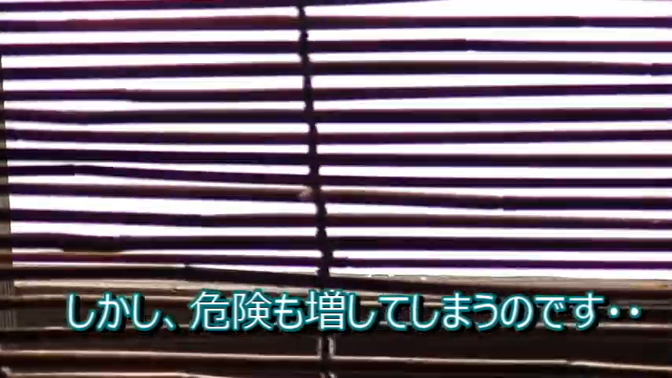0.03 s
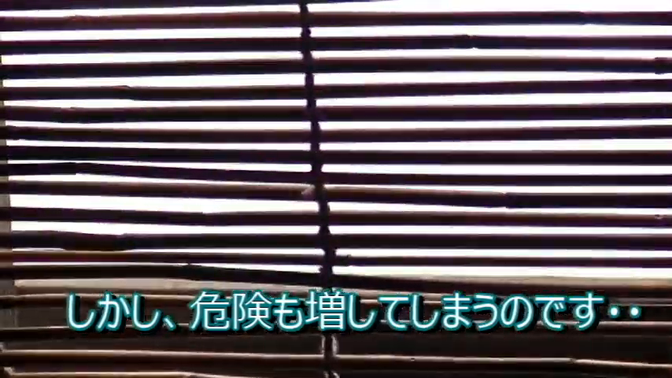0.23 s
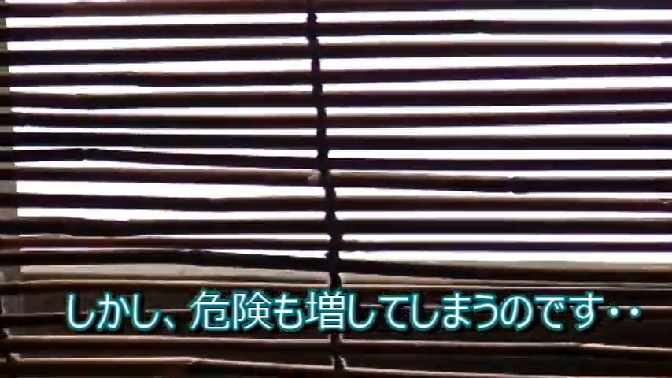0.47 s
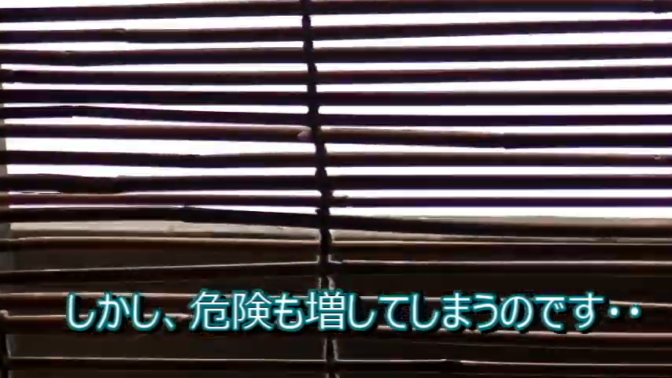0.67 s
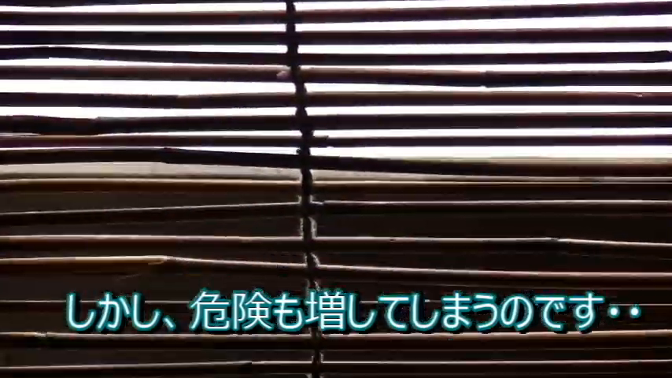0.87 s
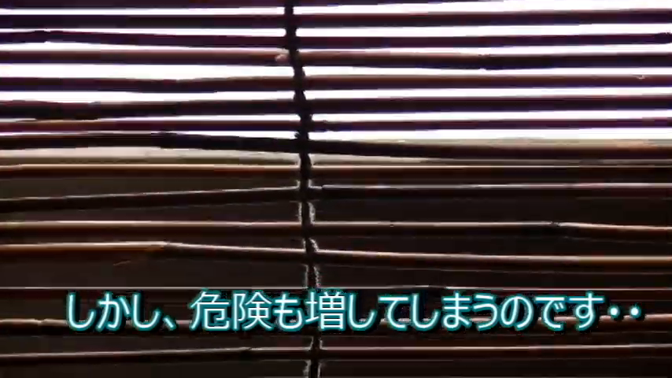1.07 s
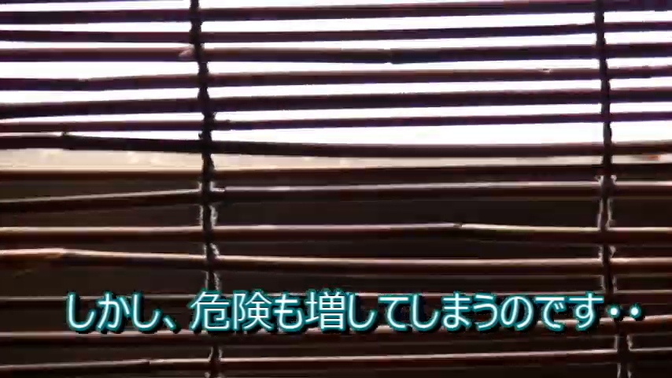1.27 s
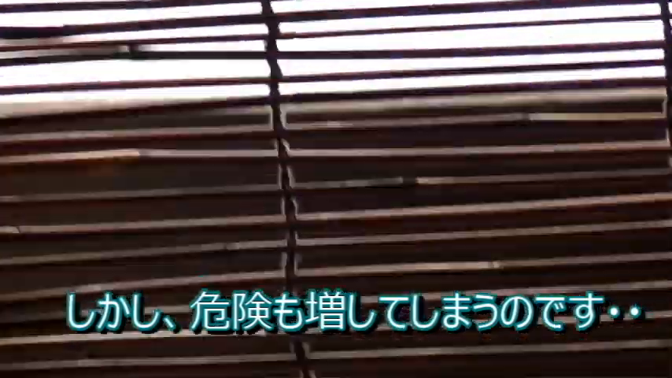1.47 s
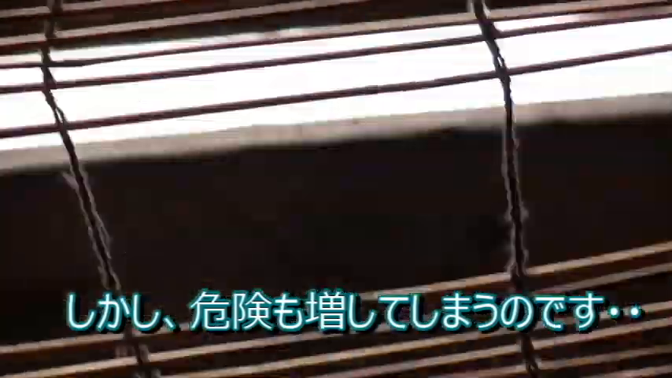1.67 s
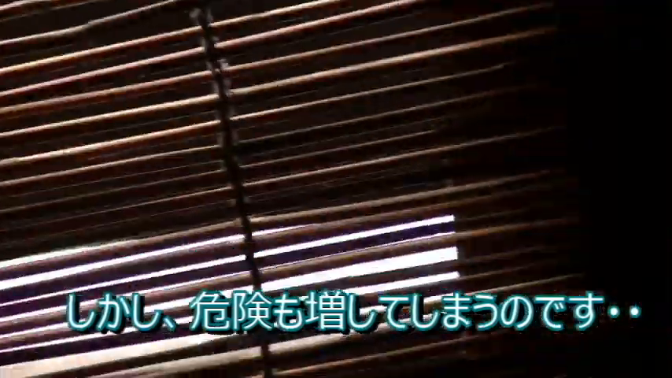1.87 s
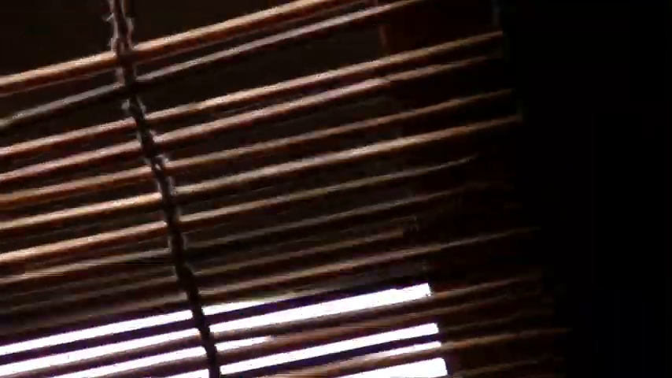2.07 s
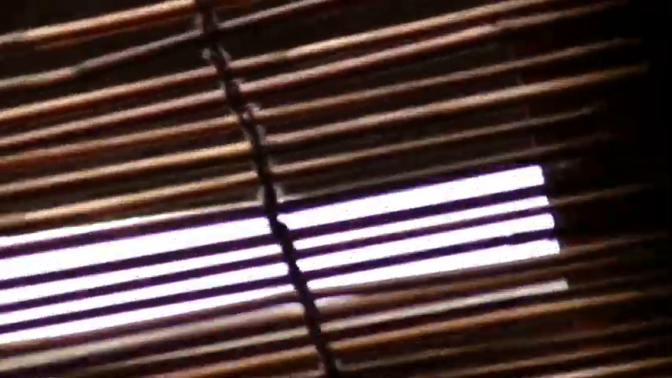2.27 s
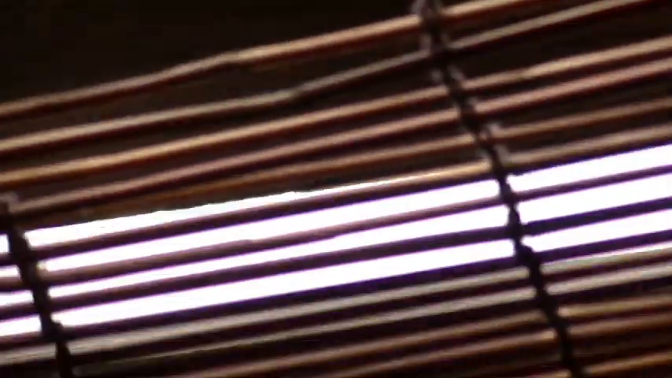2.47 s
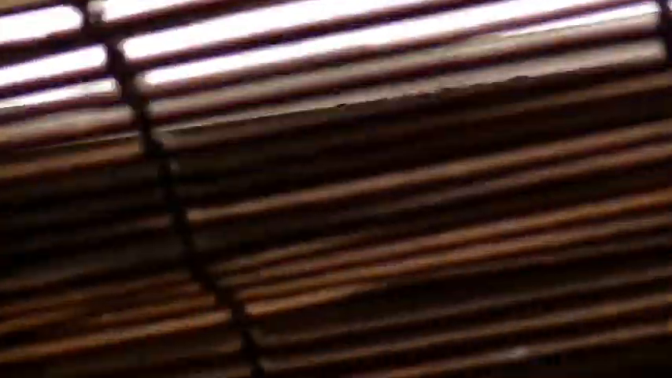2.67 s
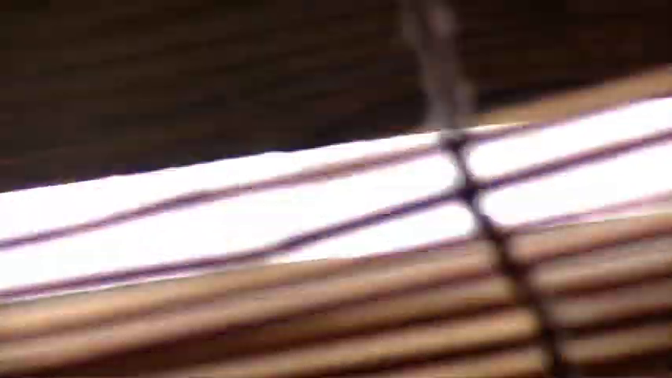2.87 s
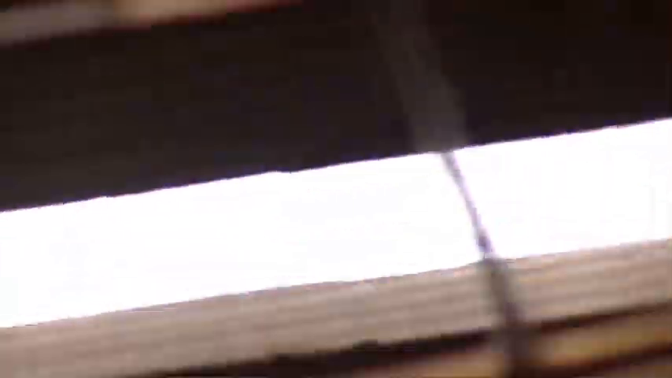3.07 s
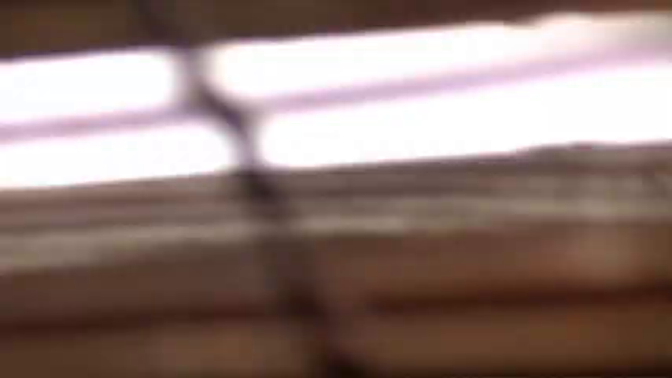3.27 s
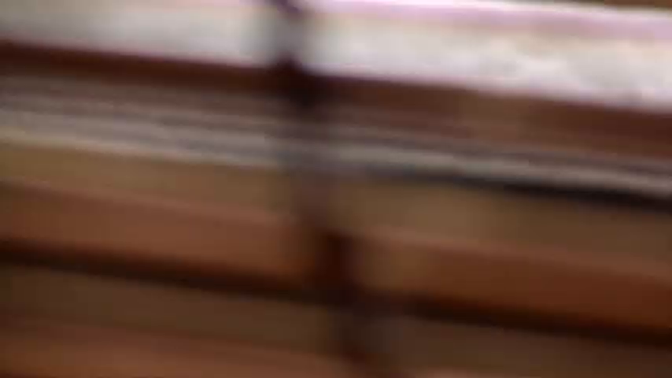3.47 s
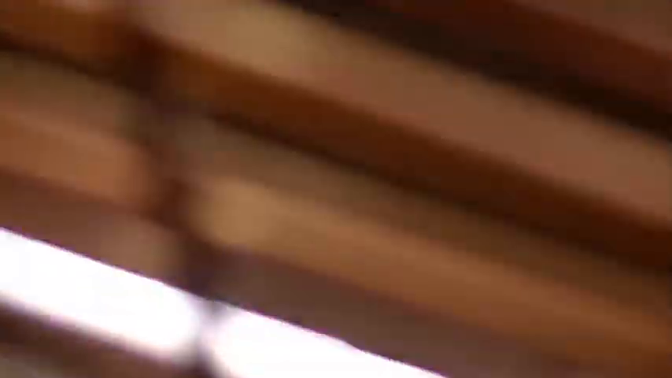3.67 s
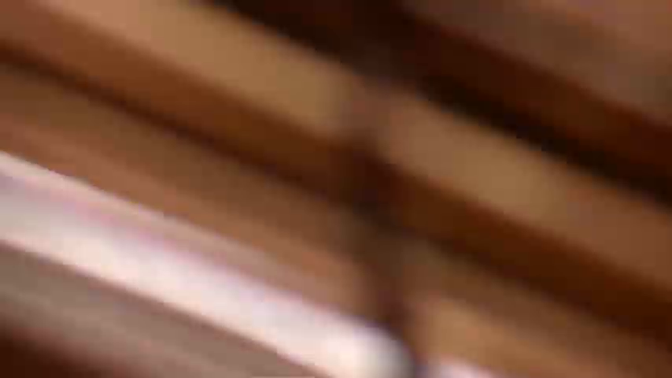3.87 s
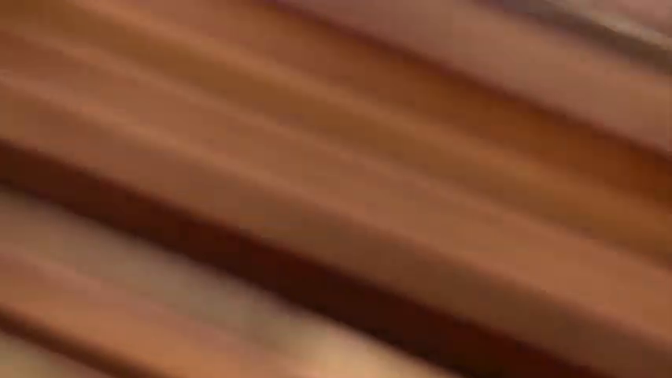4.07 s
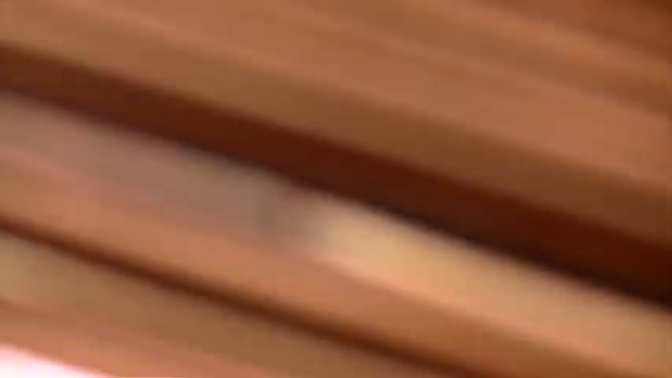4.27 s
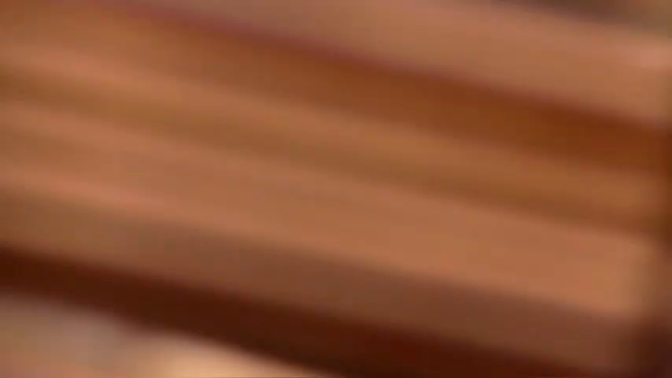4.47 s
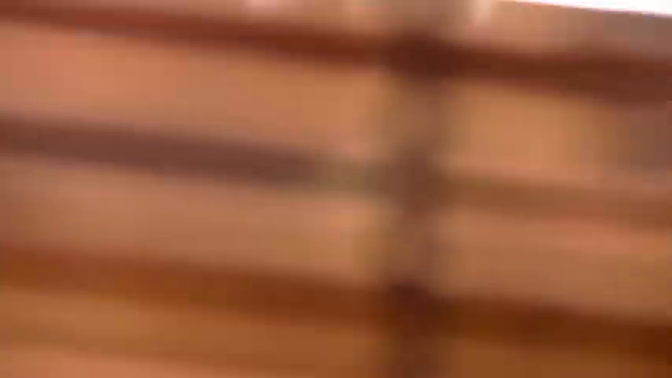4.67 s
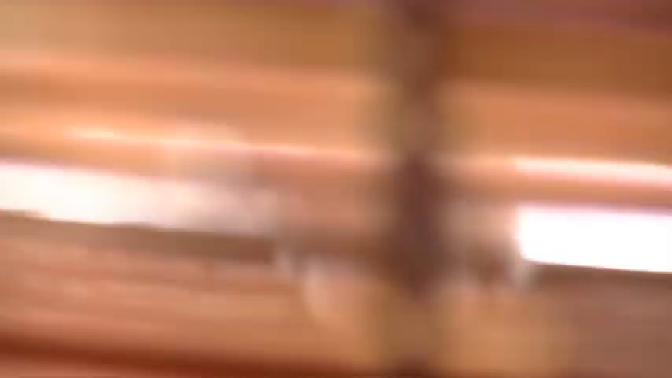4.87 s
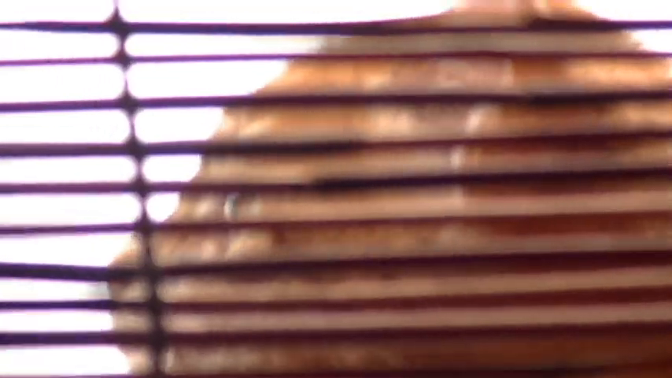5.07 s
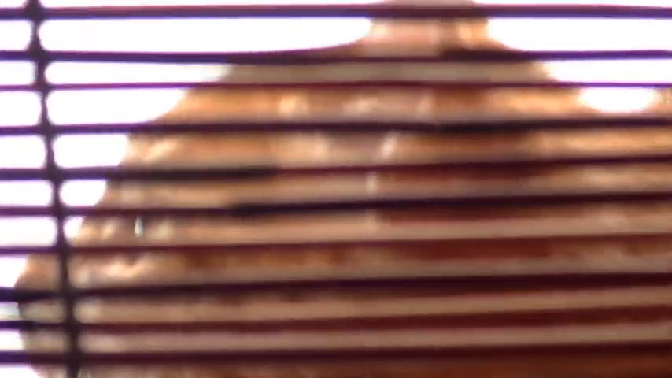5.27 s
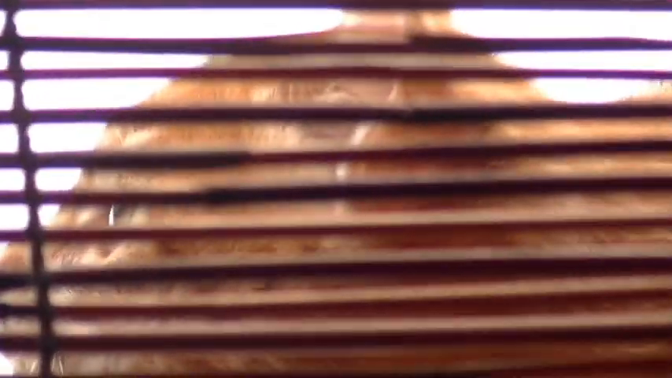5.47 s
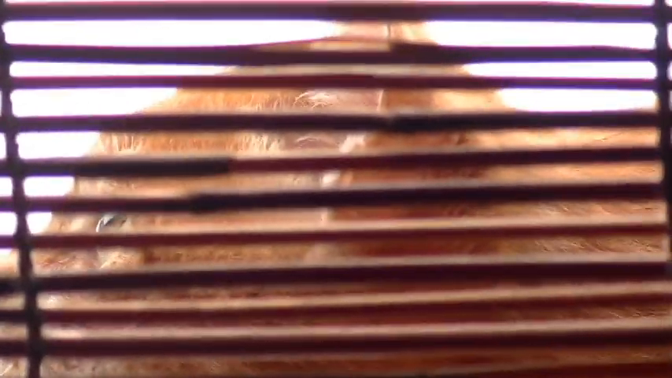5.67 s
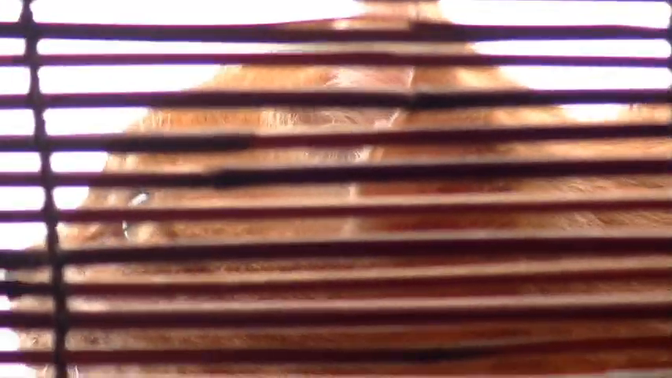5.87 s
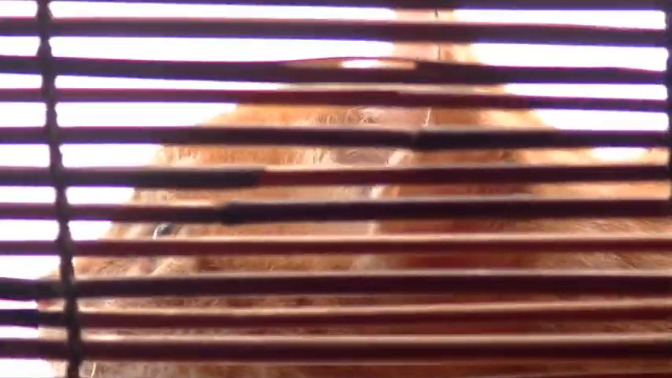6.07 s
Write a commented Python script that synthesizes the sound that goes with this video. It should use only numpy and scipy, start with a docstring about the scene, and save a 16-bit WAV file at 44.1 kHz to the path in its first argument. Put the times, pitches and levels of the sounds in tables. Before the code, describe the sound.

Soft paw thumps on a sill, light slat rattles, a flurry of hollow wooden window knocks, two last heavy bangs, then sudden near-quiet.

```python
"""Soft paws make a sill drone, then a cat clambers behind a blind of thin wooden slats at a house window.
Heard a hand's breadth away, the slats click, squeak and scrape: struck modes, and resonances driven by friction.
The swinging blind knocks on the sash, which booms and shudders in its frame: decaying modes and coloured noise.
Just before five seconds the low sounds stop dead; faint outdoor noise, a few scrapes and
a tiny ticking whirr (gated tones) go on."""
import sys
import numpy as np
from scipy import signal
from scipy.fft import rfft, irfft
from scipy.io import wavfile
from scipy.ndimage import uniform_filter1d

SR = 44100
rng = np.random.default_rng(int(sys.argv[2]) if len(sys.argv) > 2 else 0)


def transcribe(signal):
    """Save signal, clipped to [-1, 1], as a 16-bit WAV file at the path in sys.argv[1]."""
    frames = np.atleast_2d(signal).T
    limited = np.clip(frames, -1, 1)
    pcm = np.round(limited * 32767).astype(np.int16)
    wavfile.write(sys.argv[1], SR, pcm)


N = 269892
TIME = np.arange(N) / SR
RING = TIME[:SR]  # seconds after a blow, up to one second

# The blind hits the window; boom of the pane, knock of the frame, clack of the contact:
# start_s, boom_db, frame_db, clack_db
KNOCKS = [(1.592, -55, -52, -61), (1.885, -50.5, -43.5, -58), (1.962, -46, -51.5, -55),
          (2.356, -44.5, -60, -56), (2.683, -44.5, -43.5, -69), (2.887, -40, -49, -46),
          (3.085, -39.5, -44, -41), (3.147, -27, -25, -35.5), (3.159, -27.5, -26, -41),
          (3.177, -28, -38, -61), (3.205, -33.5, -60, -70), (3.223, -28, -33.5, -49),
          (3.359, -39, -40, -66), (3.416, -45, -50, -70), (3.479, -19.5, -20, -32.5),
          (3.572, -26.5, -39.5, -54), (3.6, -32, -54, -73), (4.606, -53, -63, -58.5),
          (4.7133, -14, -19, -29), (4.763, -24, -34.5, -62), (4.795, -46, -32, -55), (4.822, -16, -19, -31),
          (4.902, -30.5, -43, -49)]
# Modes of pane and frame, with relative levels: mode_hz, level_db, t60_s
WINDOW_MODES = [(141.3, -15.5, 1), (237.1, 1.5, 0.29), (267, -9, 0.37), (344.7, -6.5, 0.41),
                (378, -4.5, 0.5), (430.6, -10, 0.5), (454, -9, 0.87), (587, 1, 0.22), (642, -2, 0.12),
                (694.7, -3.5, 0.39), (763, 3, 0.16), (821.4, 6, 0.14), (915, 23, 0.024), (1056, 7.5, 0.13),
                (1282, 9, 0.082), (1484, 3.5, 0.047), (2015, -1.5, 0.054), (2086, 2.5, 0.053),
                (2370, -11, 0.025)]
# Relative spectrum of the chattering sash: frequency_hz, level_db
WINDOW_COLOUR = [(40, -53), (100, -54), (230, 0), (420, -8.5), (540, -13.5), (760, -4), (1250, -5.5),
                 (1600, -15), (2150, -19), (2800, -25), (5000, -36), (15000, -79)]


def knocks(chatter_db=-6, chatter_t60_s=0.29, room_db=-16, room_t60_s=1.0,
           swell_s=0.011, frame_lag_s=0.00249, friction_per_s=110):
    """Impact excitation: the blind lands along its length, so the sash rings, chatters and fills the room."""
    out = np.zeros((2, N))
    landing = np.minimum(0.38 + RING / swell_s, 1)
    for start_s, boom_db, frame_db, clack_db in KNOCKS:
        chatter = struck(noise(WINDOW_COLOUR, size=SR) * fade(chatter_t60_s))
        room = noise(SHUDDER_COLOUR, size=SR) * fade(room_t60_s)
        ringing = modes(WINDOW_MODES, scatter_db=4.0, detune=0.0078)
        body = landing * (ringing + undb(chatter_db) * chatter + undb(room_db) * room)
        # the harder the sash is driven, the faster friction in its groove calms it
        body = body / (1 + friction_per_s * undb(boom_db) * RING)
        # a heavy blow moves the pane
        boom = struck(band(body, "band", [55, 545]))
        add(out, start_s, undb(boom_db) * boom)
        # the sash takes up its play and meets the frame later; a hard contact adds the clack
        frame = struck(band(body, "band", [560, 1400]))
        clack = struck(band(body, "band", [1580, 3600]))
        add(out, start_s + frame_lag_s, undb(frame_db) * frame + undb(clack_db) * clack)
    return out


# How strongly the blind sways, as the relative level of the trembling it keeps up: time_s, level_db
SWAY = [(0, -41.5), (.35, -51), (.68, -48), (1.1, -49.5), (1.37, -52), (1.68, -41), (1.82, -48.5),
        (2.55, -47.5), (2.8, -43.5), (3.4, -43.5), (3.9, -40.5), (4.15, -46.5), (4.45, -45), (4.8, -46),
        (4.95, -51.5)]
# The blind leans softly on the sash, relative to the same level: hardest_push_s, level_db, length_s
NUDGES = [(1.19, -41.5, 0.061), (1.96, -40.5, 0.14), (5.29, -46, 0.061), (5.5, -48.5, 0.078),
          (5.98, -43, 0.067)]
# Relative spectrum of the jolts in the sash and of the room: frequency_hz, level_db
SHUDDER_COLOUR = [(30, -8), (90, -12.5), (150, 0.5), (250, 2.5), (420, 0), (560, 0), (800, -8.5),
                  (1300, -15), (2500, -21.5), (6000, -35.5), (15000, -79)]


def shudder(ring_db=-6, jerk_db=1.67, level_db=-1):
    """Random excitation: countless small jolts keep the modes trembling, more so as the blind sways or leans."""
    jolts = noise(SHUDDER_COLOUR, wide_db=14.5) * undb(jerk_db * walk(30))
    ring = excite(jolts, WINDOW_MODES)
    trembling = unit(unit(jolts) + undb(ring_db) * unit(ring))
    effort = np.hypot(curve(SWAY), pushes(NUDGES))
    return trembling * effort * undb(level_db)


# The bottom rail taps the frame; above dull_hz the treble falls: start_s, level_db, dull_hz
TAPS = [(2.336, -43.5, 1000), (2.969, -35, 1880), (3.8, -28.5, 3800), (3.939, -34, 1600),
        (4.277, -34, 1450), (4.371, -36.5, 1400)]
# Modes of the bottom rail against the frame, with relative levels: mode_hz, level_db, t60_s
RAIL_MODES = [(263.4, -6, 0.82), (427, -7, 0.57), (611, -0.5, 0.22), (657.5, 0.5, 0.2), (782, 6, 0.12),
              (815, 9, 0.097), (917, 1, 0.063), (1048, -9, 0.086), (1277, 5, 0.066), (2074, 1.5, 0.044)]


def taps():
    """Modal ringing: the bottom rail of the blind gives hollow taps on the frame."""
    return light_blows(TAPS, RAIL_MODES, WINDOW_COLOUR, grain_db=-2.5, grain_t60_s=0.13, swell_s=0.0014)


# A slat snaps against its neighbour; share of its own note, ring of the whole blind:
# start_s, level_db, pitch_hz, own_db, t60_s, ring_db
CLICKS = [(0.062, -55, 2500, 10, 0.032, -34), (0.374, -62.5, 4030, 1, 0.05, -25),
          (1.16, -52, 2060, 7, 0.052, -11), (1.531, -48.5, 3320, 10, 0.091, 4),
          (1.62, -61.5, 2190, -3, 0.041, 0), (1.812, -62.5, 3300, 3, 0.02, -30),
          (1.884, -53.5, 2420, -5, 0.1, 5), (2.262, -50.5, 9700, -32, 0.042, -27),
          (2.304, -48, 6400, 8, 0.022, 7), (2.336, -46, 2320, -14, 0.13, -8),
          (2.381, -48, 2320, 16, 0.045, 11), (2.425, -47.5, 11550, 5, 0.05, 9),
          (2.426, -44, 1201, 24, 0.18, -10), (2.68, -38, 5430, -6, 0.11, -26),
          (2.888, -42, 3520, -2, 0.027, -13), (2.965, -45.5, 4200, -10, 0.044, -29),
          (3.081, -38, 3280, -13, 0.13, 0), (3.429, -42.5, 2390, -17, 0.32, -26),
          (3.481, -46.5, 4100, -4, 0.084, -22), (3.578, -40, 5500, -22, 0.055, -21),
          (3.769, -51, 2300, -3, 0.017, -29), (3.789, -36.5, 6600, -12, 0.019, -37),
          (3.928, -50.5, 6960, -28, 0.018, -25), (4.479, -52, 2160, 18, 0.02, -29),
          (4.607, -52.5, 2050, 12, 0.08, -20), (4.715, -42, 5150, -24, 0.085, -27),
          (4.77, -51, 4170, -2, 0.033, -25), (4.824, -42.5, 5800, -11, 0.072, -24),
          (4.908, -43.5, 3230, 10, 0.025, -10), (5.07, -56.5, 12400, 0, 0.013, -5),
          (5.958, -55, 2600, 12, 0.048, 8)]
# Relative spectrum of a snap before thinning: frequency_hz, level_db
CLICK_COLOUR = [(300, -15), (1000, 3), (2300, 5.5), (4000, 2), (6000, -1.5), (8000, -5.5), (11500, -9),
                (16000, -24)]
# Modes of the slats, with relative levels: mode_hz, level_db, t60_s
SLAT_MODES = [(1197, 1, 0.2), (1900, 3, 0.12), (2250, 12, 0.033), (3320, -0.5, 0.085), (6360, -3, 0.11),
              (10530, 1, 0.047)]


def clicks(snap_t60_s=0.0022, room_db=-22, room_t60_s=0.16, width_times_t60=20,
           buzz_db=-3, low_edge_share=0.49, rise_per_t60=0.013):
    """Impact and coupling: a snap, the slat's short buzzing note, and a ring the cords pass to other slats."""
    out = np.zeros((2, N))
    for start_s, level_db, pitch_hz, own_db, t60_s, ring_db in CLICKS:
        decay = fade(snap_t60_s) + fade(t60_s) + undb(room_db) * fade(room_t60_s)
        # a high-pitched slat gives a thinner snap
        thin = signal.butter(2, low_edge_share * pitch_hz, "high", fs=SR)
        crack = struck(signal.lfilter(*thin, noise(CLICK_COLOUR, size=SR)) * decay)
        # the sooner a slat dies away, the broader its buzz
        width_hz = width_times_t60 / t60_s
        buzz = struck(resonate(noise(CLICK_COLOUR, size=SR), pitch_hz, width_hz) * decay)
        tone = modes([(pitch_hz, 0, t60_s)], scatter_db=0, detune=0)
        own = struck(tone + undb(buzz_db) * buzz)
        ring = modes(SLAT_MODES, scatter_db=1.0, detune=0.0055)
        # a long, grazing contact also starts more softly
        rise = 1 - np.exp(-RING / (rise_per_t60 * t60_s))
        click = struck(rise * (crack + undb(own_db) * own + undb(ring_db) * ring))
        add(out, start_s, undb(level_db) * click)
    return out


# A slat judders along a cord or its neighbour; level of its note, ring of the whole blind relative to it:
# start_s, length_s, pitch_hz, level_db, ring_db
SQUEAKS = [(1.535, 0.15, 3250, -61, 8), (1.877, 0.053, 2300, -53, 2), (1.956, 0.018, 2200, -52.5, -7.5),
           (2.692, 0.033, 2170, -48, -9), (3.08, 0.012, 11400, -51, -8), (3.09, 0.022, 6340, -38, -14),
           (3.09, 0.043, 2230, -36.5, -6), (3.099, 0.023, 3360, -53, -8)]


def squeaks(slips_per_s=1100, width_hz=140, release_s=0.012, sag_db=5, grit_db=-10):
    """Stick-slip friction: uneven slips ring a dragged slat's rough, fading note and the slats tied to it."""
    out = np.zeros((2, N))
    for start_s, length_s, pitch_hz, level_db, ring_db in SQUEAKS:
        sag = undb(-sag_db * np.minimum(RING / length_s, 1))
        drag = sag * np.exp(-np.maximum(RING - length_s, 0) / release_s)
        slips = (rng.random(SR) < slips_per_s / SR) * rng.standard_normal((2, SR))
        jerks = colour(slips, SLIDE_COLOUR, wide_db=-2) * drag
        note = struck(resonate(jerks, pitch_hz, width_hz))
        ring = struck(excite(jerks, SLAT_MODES))
        squeak = note + undb(ring_db) * ring + undb(grit_db) * struck(jerks)
        add(out, start_s, undb(level_db) * squeak)
    return out


# One slat slides over another: hardest_push_s, level_db, length_s
SCRAPES = [(0.43, -53.5, 0.065), (1.43, -53.5, 0.077), (1.62, -51.5, 0.19), (1.73, -48, 0.036),
           (1.9, -41.5, 0.059), (1.955, -47, 0.048), (2.35, -56.5, 1), (2.638, -44.5, 0.059),
           (2.76, -52.5, 0.27), (2.92, -45, 0.12), (3.108, -43.5, 0.077), (3.18, -44, 0.18),
           (3.333, -48.5, 0.14), (3.463, -40, 0.045), (3.56, -49.5, 0.19), (3.903, -46, 0.044),
           (4.23, -55, 0.04), (4.73, -48.5, 0.14), (4.895, -53, 0.099), (5.445, -55, 0.049),
           (5.777, -45, 0.076), (5.888, -49, 0.076), (6.063, -56, 0.1)]
# Relative spectrum of wood rubbing on wood: frequency_hz, level_db
SLIDE_COLOUR = [(250, -33), (700, -0.5), (1200, 1.5), (1600, -2.5), (2200, -7), (3200, -7), (6000, -3),
                (8000, -5.5), (11500, -7.5), (16000, -21.5)]


def slide(catches_per_s=1200, rub_db=-1, ring_db=-2, shift_db=4.5, jerk_db=0.97, sway_db=-17):
    """Dry friction: rough wood catches and slips in tiny clicks over a fine hiss, and sets the slats ringing."""
    catches = (rng.random(N) < catches_per_s / SR) * rng.standard_normal((2, N))
    rub = unit(colour(catches, SLIDE_COLOUR, wide_db=1.0) + undb(rub_db) * noise(SLIDE_COLOUR))
    # rubbing reaches only the lower modes, and favours other ones as the contact moves
    ring = 0
    for mode_hz, level_db, t60_s in SLAT_MODES[:4]:
        ring = ring + undb(level_db + shift_db * walk(21.915)) * resonate(rub, mode_hz, 24 / t60_s)
    # between the scrapes the swaying slats keep rubbing faintly
    effort = np.hypot(pushes(SCRAPES), undb(sway_db) * curve(SWAY))
    return unit(rub + undb(ring_db) * unit(ring)) * effort * undb(jerk_db * walk(70))


# A paw comes down on the sill; above dull_hz the treble falls: start_s, level_db, dull_hz
BUMPS = [(0.001, -40.5, 1700), (0.028, -39.5, 1110), (0.137, -39, 2380), (0.208, -41.5, 1800)]
# Modes of the sill, with relative levels: mode_hz, level_db, t60_s
SILL_MODES = [(147.3, -4.5, 0.98), (233, 5.5, 0.46), (338, 1.5, 0.46), (716, -1, 0.28), (832, -10, 0.42)]


def bumps():
    """Soft impact: padded paws make the sill drone."""
    return light_blows(BUMPS, SILL_MODES, SHUDDER_COLOUR, grain_db=1.5, grain_t60_s=0.22, swell_s=0.0075)


# Tiny ticking whirr, perhaps a focusing lens: time_s, lower_pip_db, upper_pip_db
WHIRR = [(0, -71, -80), (1.08, -77, -81), (1.3, -82, -80), (4.7, -82, -95), (4.96, -69.5, -89),
         (5.35, -74, -73), (5.7, -74, -80), (6.12, -82, -78)]


def whirr(tick_hz=31.0, lower_hz=3920, upper_hz=5880, upper_jitter_db=3.0):
    """Amplitude modulation: two tones are gated into soft, slightly uneven pips."""
    phase = np.cumsum(tick_hz * (1 + 0.025 * walk(7.1))) / SR
    pips = np.sin(np.pi * phase) ** 8 * undb(1.5 * walk(30))
    levels = np.array(WHIRR)
    lower = unit(pips * np.sin(2 * np.pi * lower_hz * TIME))
    upper = unit(pips * undb(upper_jitter_db * walk(17)) * np.sin(2 * np.pi * upper_hz * TIME))
    return lower * curve(levels[:, :2]) + upper * curve(levels[:, ::2])


# Low rumble of the hand that holds the microphone: time_s, level_db
RUMBLE = [(0, -60.5), (.5, -72), (1.1, -75), (2.1, -82), (2.6, -62), (3.1, -50), (3.9, -52.5), (4.6, -58)]
# Relative spectrum of that rumble: frequency_hz, level_db
RUMBLE_COLOUR = [(15, -3), (42, 2.5), (70, 7.5), (120, 9), (300, -28.5), (1000, -54)]


def rumble():
    """Handling noise: low-frequency random vibration whose level follows the hand."""
    return noise(RUMBLE_COLOUR, wide_db=-11.0) * curve(RUMBLE)


# Relative spectrum of the outdoor air: frequency_hz, level_db
OUTDOOR_COLOUR = [(25, -15), (150, -15.5), (300, -9.5), (480, -34), (700, -12), (1100, -10.5), (1500, -12),
                  (2200, -13), (3200, -13), (6500, -16), (11000, -19.5), (16000, -26)]


def outdoors(level_db=-60.5, hum_hz=700, hum_waver_db=1.0, hum_db=-6):
    """Diffuse sound field: a distant wash swells a little around a gently wavering hum, under steady hiss."""
    air = noise(OUTDOOR_COLOUR, wide_db=17.5)
    wash = signal.sosfiltfilt(signal.butter(2, 1400, fs=SR, output="sos"), air)
    hiss = air - wash
    swell = undb(1.5 * walk(12))
    hum = undb(hum_db + hum_waver_db * walk(3.7)) * unit(np.sin(2 * np.pi * hum_hz * TIME))
    return undb(level_db) * (hiss + wash * swell + hum)


def light_blows(rows, table, grain_colour, grain_db, grain_t60_s, swell_s):
    """Contact stiffness: wood rings cleanly over a little grain, and a softer contact is duller."""
    out = np.zeros((2, N))
    for start_s, level_db, dull_hz in rows:
        grain = struck(noise(grain_colour, size=SR) * fade(grain_t60_s))
        body = modes(table, scatter_db=2.5, detune=0.0046) + undb(grain_db) * grain
        swell = 1 - np.exp(-RING / swell_s)
        body = signal.lfilter(*signal.butter(2, dull_hz, fs=SR), body * swell)
        add(out, start_s, undb(level_db) * struck(body))
    return out


def modes(table, scatter_db, detune):
    """Modal superposition: decaying sines, weighted anew as each blow lands on another spot."""
    out = 0
    for mode_hz, level_db, t60_s in table:
        size, shift, skew = rng.standard_normal(3)
        # left and right phases part by more where the stereo width is greater
        spread = skew * gains(WIDTH, mode_hz) * np.array([[1], [-1]])
        phase = rng.uniform(0, 2 * np.pi) + spread
        tone = np.sin(2 * np.pi * mode_hz * (1 + detune * shift) * RING + phase)
        out = out + undb(level_db + scatter_db * size) * fade(t60_s) * tone
    return struck(out)


def excite(x, table):
    """Resonant build-up: drive a table of modes; the longer a mode rings, the more it builds up."""
    ring = 0
    for mode_hz, level_db, t60_s in table:
        width_hz = np.log(1000) / np.pi / t60_s
        ring = ring + undb(level_db) * t60_s * resonate(x, mode_hz, width_hz)
    return ring


def resonate(x, centre_hz, width_hz):
    """Resonance: a second-order peak with a gain of 1 at its centre."""
    return signal.lfilter(*signal.iirpeak(centre_hz, centre_hz / width_hz, SR), x)


def pushes(rows, edge_db=9.5, build_share=0.43):
    """Energy summation: soft pushes build up, peak and ease off, edge_db weaker at both ends of their length."""
    power = 0
    for peak_s, level_db, length_s in rows:
        before = (peak_s - TIME) / build_share
        after = (TIME - peak_s) / (1 - build_share)
        away = np.maximum(before, after) / length_s
        power = power + undb(level_db - edge_db * away) ** 2
    return np.sqrt(power)


# Stereo width, side minus mid: frequency_hz, level_db
WIDTH = [(30, -6), (130, -24.5), (400, -27), (1000, -21.5), (2000, -15.5), (4000, -10), (8000, -7),
         (12000, -4)]


def colour(pair, points, wide_db):
    """Mid-side stereo: colour two signals and mix them to left and right, wider for a higher wide_db."""
    size = pair.shape[1]
    hz = np.fft.rfftfreq(size, 1 / SR)
    mid, side = rfft(pair) * gains(points, hz)
    side = side * np.minimum(gains(WIDTH, hz) * undb(wide_db), 1)
    return unit(irfft(np.array([mid + side, mid - side]), size))


def noise(points, wide_db=0, size=N):
    """Spectral shaping: coloured stereo noise."""
    return colour(rng.standard_normal((2, size)), points, wide_db)


def walk(rate_hz):
    """Smoothed random process: wandering with a spread near 1."""
    step = int(SR / rate_hz)
    held = np.repeat(rng.standard_normal(N // step + 1), step)
    return 1.9 * uniform_filter1d(held, step)[:N]


def band(x, kind, hz):
    """Causal filtering: a Butterworth design of order 4."""
    return signal.sosfilt(signal.butter(4, hz, kind, fs=SR, output="sos"), x)


def fade(t60_s):
    """Exponential decay: 60 dB lost in t60_s after a blow."""
    return np.exp(-np.log(1000) * RING / t60_s)


def curve(rows):
    """Level envelope: gain through time from (time_s, level_db) rows."""
    return undb(np.interp(TIME, *np.transpose(rows)))


def gains(points, hz):
    """Frequency response: gain at hz from (frequency_hz, level_db) points on a log axis."""
    point_hz, level_db = np.transpose(points)
    return undb(np.interp(np.log(hz + 1), np.log(point_hz), level_db))


def undb(db):
    """Logarithmic level: decibels to amplitude gain."""
    return 10 ** (np.asarray(db) / 20)


def unit(x):
    """Mean-square level: scale to an rms of 1."""
    return x / np.sqrt(np.mean(x ** 2))


def struck(x):
    """Short-time level: scale a blow so that its first 40 ms have an rms of 1."""
    return x / np.sqrt(np.mean(x[:, :SR // 25] ** 2))


def add(out, start_s, sound):
    """Linear superposition: mix a sound in at a time."""
    i = max(int(start_s * SR), 0)
    out[:, i:i + sound.shape[1]] += sound[:, :N - i]


def scene(stop_s=4.948, thin_above_hz=597):
    """Superposition: lows stop dead at stop_s; slats, a thin trembling and the background carry on."""
    running = np.clip((stop_s - TIME) * 500, 0, 1)  # falls to 0 within 2 ms
    sash = shudder()
    full = knocks() + taps() + bumps() + sash + rumble()
    thin = band(sash, "high", thin_above_hz)
    slats = clicks() + squeaks() + slide()
    return full * running + thin * (1 - running) + slats + whirr() + outdoors()


def record(dry, top_hz=16000):
    """Band limiting: a steep elliptic low-pass cuts the top."""
    return signal.sosfilt(signal.ellip(10, .2, 70, top_hz, fs=SR, output="sos"), dry)


dry = scene()
out = record(dry)
transcribe(out)
```